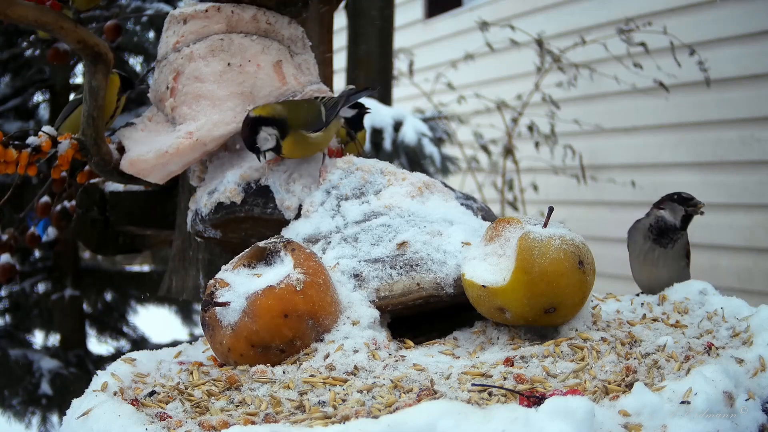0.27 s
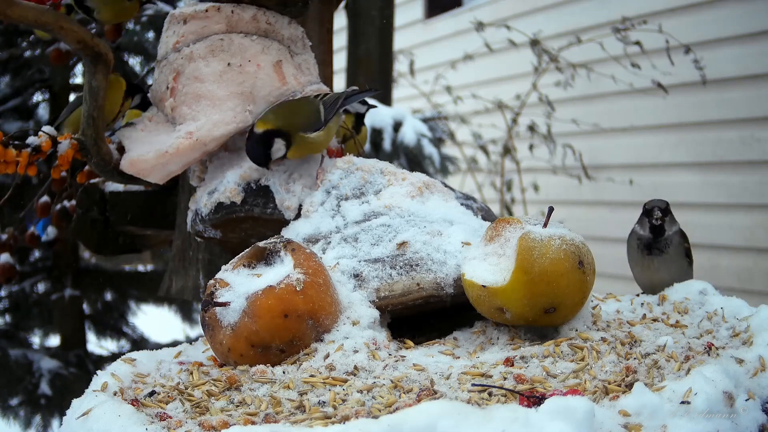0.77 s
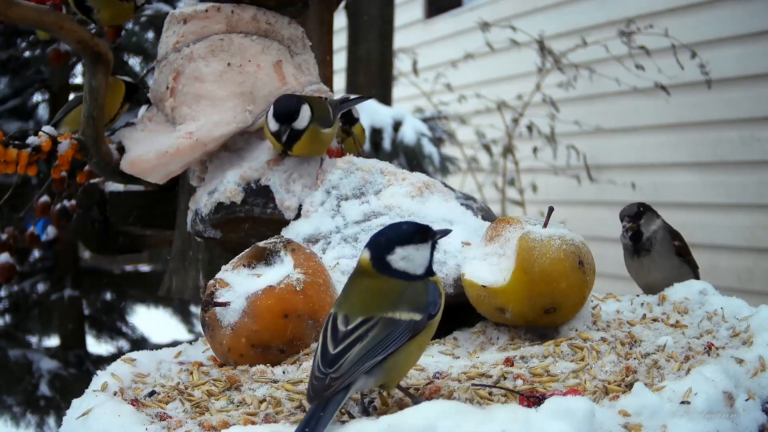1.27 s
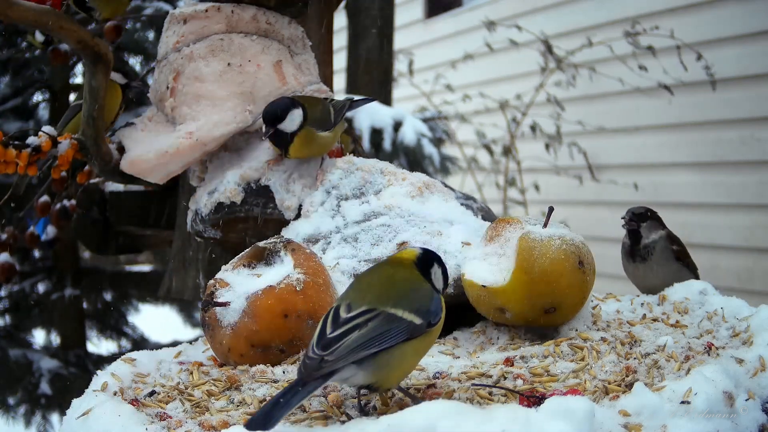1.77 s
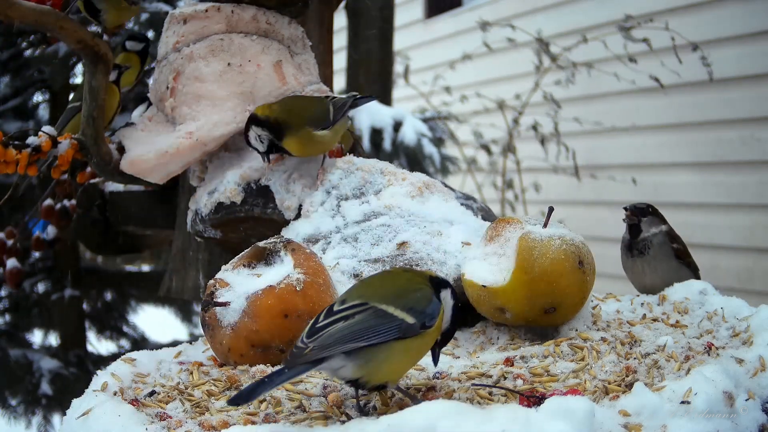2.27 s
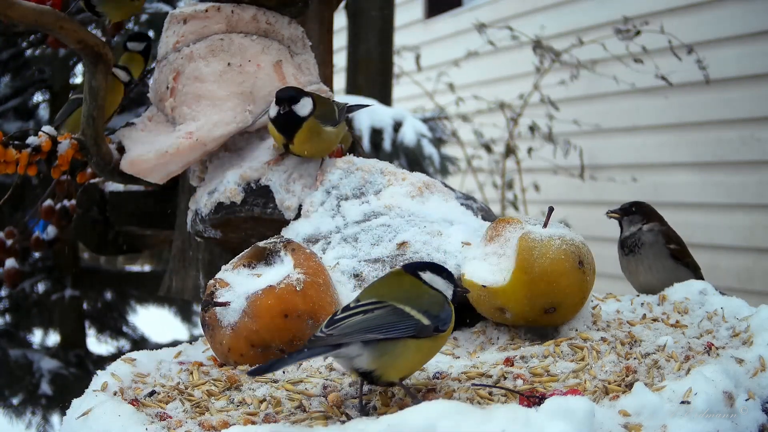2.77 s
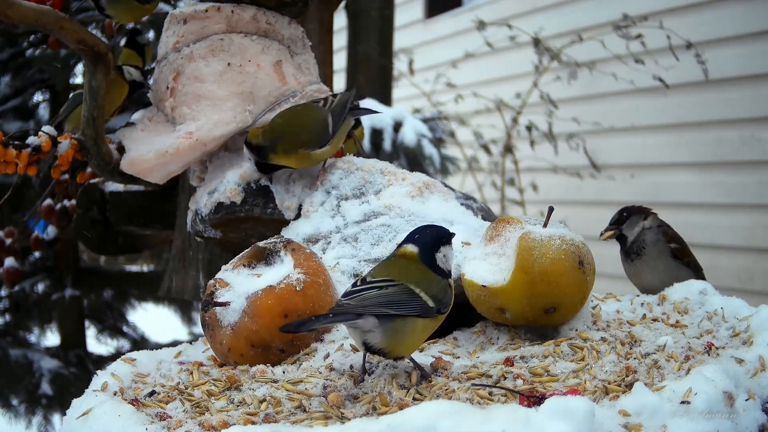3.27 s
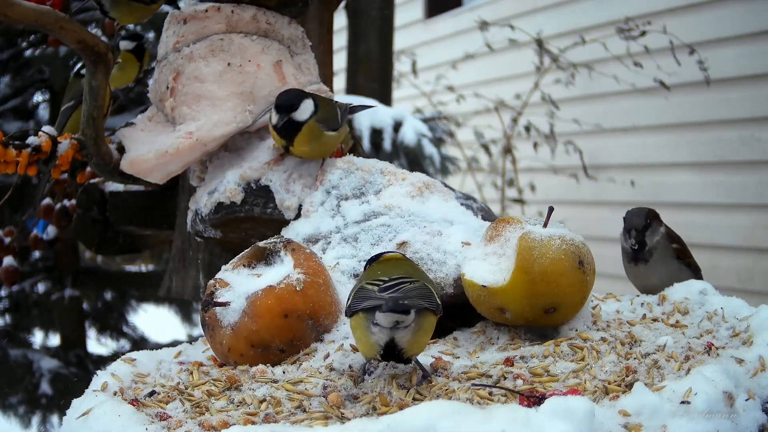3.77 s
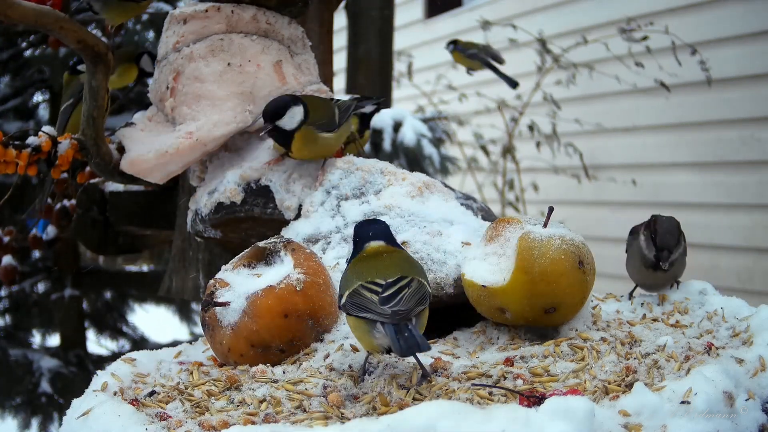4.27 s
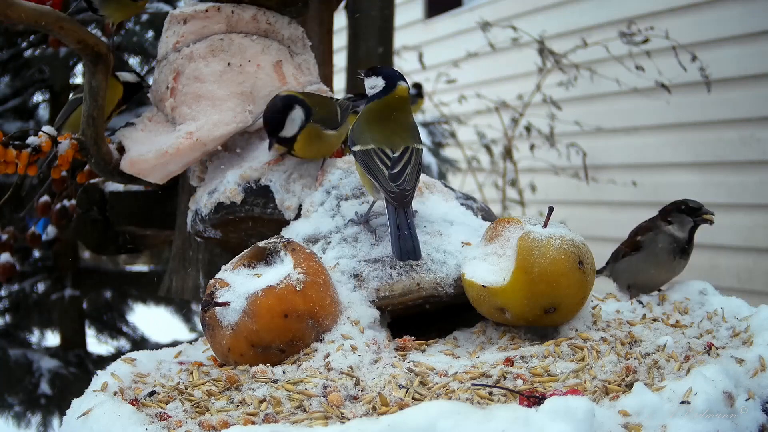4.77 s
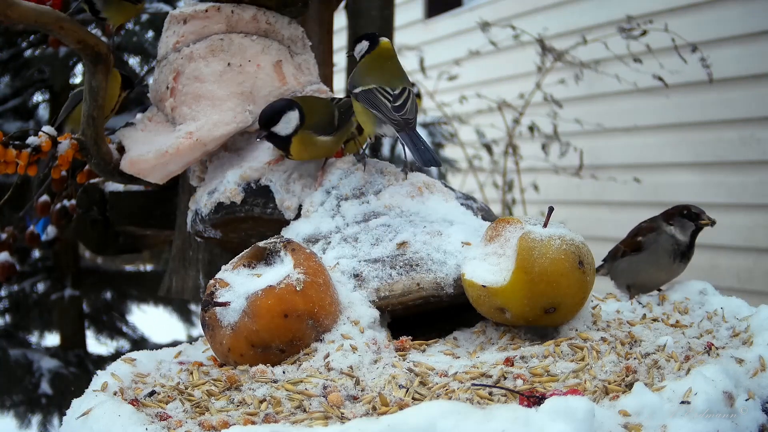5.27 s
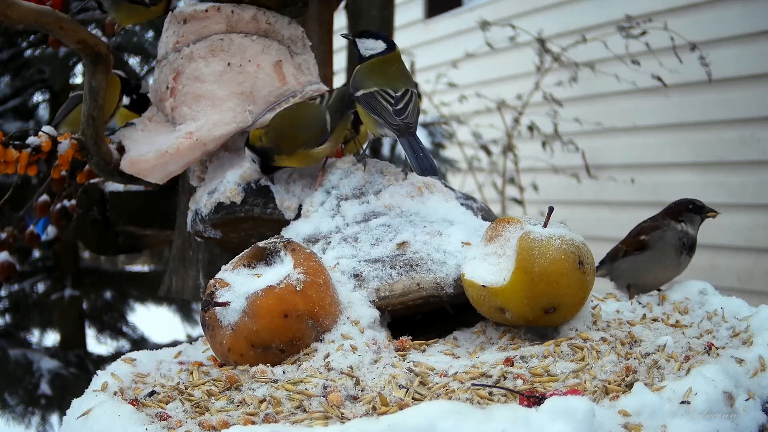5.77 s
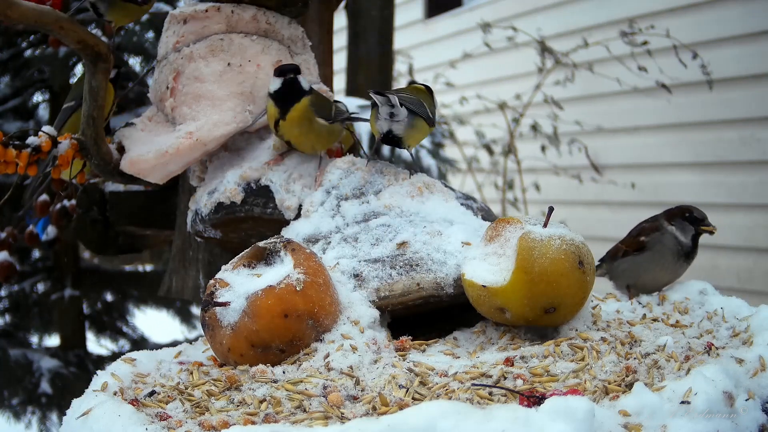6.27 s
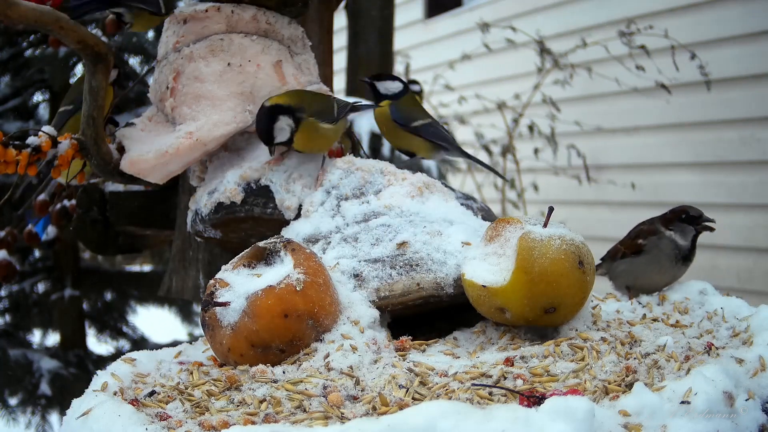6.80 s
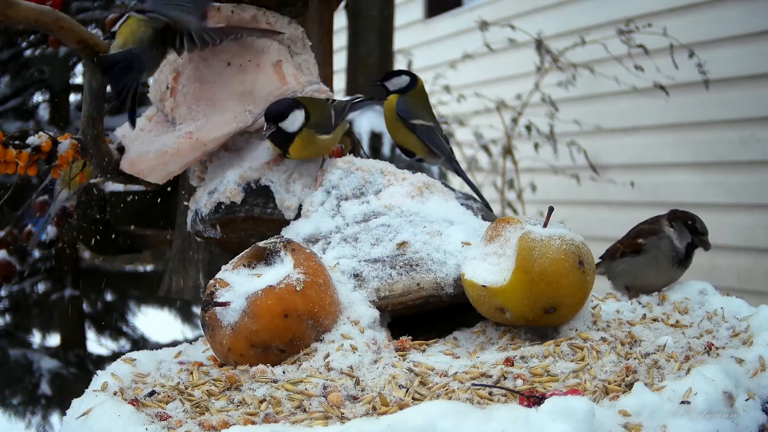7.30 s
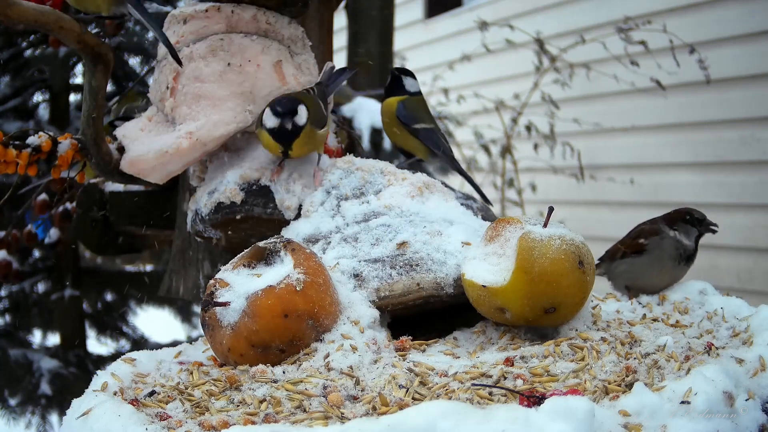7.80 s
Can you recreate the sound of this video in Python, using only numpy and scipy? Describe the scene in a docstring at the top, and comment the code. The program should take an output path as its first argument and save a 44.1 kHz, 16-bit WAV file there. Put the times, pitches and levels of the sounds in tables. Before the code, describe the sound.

Small birds peck and scratch through frozen seed on a snowy feeder, bright crackling snaps and ticks, thinning to a few faint whistles

```python
"""Small birds peck and scratch among frozen seed on a snowy feeder: 8 s, close and bright.
From the start husks snap as short rings over a patter of small snaps; claws stir grains, as ticks and noise bursts.
Landings and beak taps are short knocks; wing puffs and a breeze are shaped noise over a hush.
The snaps peak near 2.4 and 3.7 s; the patter thins from 5.75 s and is sparse after 7.2 s.
Thin gliding whistles call from 6.4 to 7.8 s; the last wing puffs come at 8 s."""
import sys
import numpy as np
from scipy import signal
from scipy.fft import rfft, irfft, next_fast_len
from scipy.io import wavfile
from scipy.ndimage import uniform_filter1d, map_coordinates

SR = 44100
rng = np.random.default_rng(int(sys.argv[2]) if len(sys.argv) > 2 else 0)


def persist_wave(psi):
    """Save psi, clipped to +-1, as 16-bit WAV."""
    counts = np.round(np.clip(psi, -1, 1) * 32767).astype(np.int16)
    wavfile.write(sys.argv[1], SR, np.atleast_2d(counts).T)


N = 354563

# rate of small random snaps: time_s, snaps_per_s
PATTER = [(0, 58), (5.75, 58), (5.9, 18), (7.15, 14), (7.25, 4.9), (8.04, 4.2)]
# air at the port: time_s, breeze_db, eddy_db
AIR = [(0.0, -66, -60), (1.03, -50, -55), (1.66, -50, -57), (2.24, -58.5, -59.5), (2.62, -54.5, -55.5),
       (3.36, -61.5, -60.5), (3.85, -50.5, -56.5), (4.25, -64, -55), (4.57, -57.5, -58.5),
       (8.04, -68, -62.5)]
SMALL_HZ = 7650  # typical pitch of grains and splinters
REST_DB = -59  # resting rustle at the busiest patter


def amp(db):
    """Gain of a level in dB."""
    return 10 ** (np.asarray(db) / 20)


def unit(x):
    """Scale to rms 1."""
    return x / np.sqrt(np.mean(x ** 2) + 1e-20)


def curves(rows):
    """Interpolate each column after the time to one value per sample."""
    time_s, *columns = np.transpose(rows)
    return [np.interp(np.arange(N) / SR, time_s, column) for column in columns]


def wobble(knots_per_s):
    """Smooth random curve through normal knots."""
    knots = rng.standard_normal(int(N * knots_per_s / SR) + 4)
    return map_coordinates(knots, [np.arange(N) * knots_per_s / SR])


def coloured(x, points):
    """Filter x through (hz, db) points on a log axis, rms 1."""
    size = next_fast_len(N + 8192)
    point_hz, point_db = np.transpose(points)
    hz = np.fft.rfftfreq(size, 1 / SR)
    gain_db = np.interp(np.log(hz + 1), np.log(point_hz + 1), point_db, left=-120, right=-120)
    return unit(irfft(rfft(x, size) * amp(gain_db), size)[:N])


def blip(t, hz, rise, fall, order=2):
    """Sine of random phase under an envelope that swells and dies, envelope peak 1."""
    shape = (1 - np.exp(-t / rise)) ** order * np.exp(-t / fall)
    return shape / shape.max() * np.sin(2 * np.pi * (hz * t + rng.random()))


def snaps():
    """Each husk rings briefly, knocks the tray, sheds crumbs and throws three late splinters."""
    # loudest beak and claw snaps: time_s, level_db, pitch_hz, knock_db (re snap), length_ms
    loud_snaps = [(0.041, -22.5, 7430, -23, 0.062), (0.1458, -30, 6800, -3, 0.21),
                  (0.1621, -19.5, 7300, -17, 0.25), (0.2382, -22, 7200, -9, 0.36),
                  (0.2944, -23.5, 7600, -20, 0.77), (0.3575, -14.5, 6960, -14, 0.34),
                  (0.3964, -21.5, 7800, -19, 0.12), (0.4106, -25, 7300, -20, 0.16),
                  (0.4674, -23.5, 7100, -36.0, 0.37), (0.4735, -17.5, 7330, -28, 0.15),
                  (0.5539, -21.5, 6830, -13, 0.14), (0.5693, -22, 7940, -36.0, 1.2),
                  (0.6194, -25, 7300, -4, 0.38), (0.8392, -13.5, 7800, -44.0, 0.76),
                  (0.9371, -29, 7830, -36.0, 0.7), (0.9405, -20.5, 7900, -24, 1.3),
                  (0.9626, -31, 7260, 1, 0.43), (0.9706, -10, 6800, -8, 0.21),
                  (0.9865, -15.5, 7500, -16, 0.38), (1.0257, -20, 7000, -6, 0.34),
                  (1.0484, -18, 6200, -6, 0.22), (1.0987, -17, 7140, -16, 0.33),
                  (1.109, -18, 7450, -18, 0.47), (1.1865, -16, 7700, -15.5, 0.84),
                  (1.1898, -20, 7400, -21.0, 0.13), (1.2043, -17, 7700, -25, 0.43),
                  (1.3018, -21.5, 7300, -3, 0.15), (1.3094, -16.5, 8600, -7, 0.13),
                  (1.3579, -18.5, 7950, -10, 0.12), (1.4085, -19, 7750, -9, 0.2),
                  (1.4249, -18, 8550, -18, 0.18), (1.4379, -20, 7150, -4, 0.18),
                  (1.4641, -18, 7960, -9, 0.19), (1.5162, -19, 7200, -29.0, 0.47),
                  (1.5244, -18, 7300, -26, 0.34), (1.5688, -15.5, 7260, -2, 0.25),
                  (1.6066, -15.5, 6560, -9, 0.24), (1.6269, -18.5, 7640, -22, 0.41),
                  (1.6826, -30, 7600, -7, 0.5), (1.7001, -25, 7100, 0, 0.25),
                  (1.8107, -15, 5530, -20, 0.21), (1.8242, -13, 7670, -6.5, 0.32),
                  (1.8324, -13, 7850, -14, 0.13), (1.8669, -19, 8070, -27.0, 0.13),
                  (2.0106, -21, 7400, -37.0, 0.7), (2.0426, -21.5, 7760, -7, 0.58),
                  (2.0605, -16, 7500, -15, 0.35), (2.1181, -17.5, 7420, -8, 0.57),
                  (2.1526, -21, 7970, -15, 2), (2.1603, -16, 7200, -10, 0.2),
                  (2.1904, -16.5, 7700, -24, 0.57), (2.2088, -17, 7500, -18, 0.24),
                  (2.2239, -20, 7950, -11, 0.31), (2.2867, -21.5, 6050, -2, 0.4),
                  (2.2906, -19, 7840, -21, 0.64), (2.3188, -17.5, 7800, -15, 0.84),
                  (2.3386, -18, 6440, -6, 0.26), (2.3466, -13, 7600, -15, 0.85),
                  (2.3537, -18, 7400, -22, 0.49), (2.371, -16, 6740, -10, 0.4),
                  (2.3766, -14, 7930, -17, 0.83), (2.3898, -18, 7200, -11, 0.76),
                  (2.4052, -8, 6200, -19, 0.16), (2.4131, -9.5, 7200, -8.5, 0.31),
                  (2.4229, -12, 7350, -21, 0.63), (2.4289, -9.0, 7860, -39.0, 1.6),
                  (2.5419, -15.5, 7700, -11, 0.5), (2.5586, -10.5, 8370, -18, 0.13),
                  (2.572, -10, 7200, -25.0, 0.22), (2.5766, -11, 7640, -7, 0.13),
                  (2.5854, -15.5, 6900, -28, 0.24), (2.6051, -17, 7460, -33.0, 0.72),
                  (2.6199, -19, 8900, -30, 0.5), (2.636, -14, 8100, -26, 0.43),
                  (2.6433, -16, 8060, -29, 0.37), (2.6668, -18, 7440, -23.0, 0.2),
                  (2.692, -26, 7600, -18, 0.3), (2.7466, -16.5, 7700, -16, 0.49),
                  (2.7618, -24.5, 7200, -6, 0.34), (2.7775, -27.5, 7800, -15, 0.6),
                  (2.8224, -21.5, 7530, -35.0, 0.34), (3.0515, -25, 7820, -33.0, 0.68),
                  (3.0949, -24, 7200, -9, 0.43), (3.1296, -16.5, 8000, -7.5, 0.35),
                  (3.2502, -14, 7700, -14.5, 0.59), (3.4152, -22.5, 6900, -5, 0.19),
                  (3.5312, -15.5, 7560, -10, 0.14), (3.5349, -20.5, 7060, -7.5, 0.63),
                  (3.5686, -20, 7450, -6, 0.17), (3.629, -20, 7260, -18, 0.28),
                  (3.6411, -8.5, 7960, -26, 0.98), (3.6671, -4, 7960, -15, 0.94),
                  (3.6737, -10, 7000, -15, 0.25), (3.6809, -12, 7140, -15, 0.48),
                  (3.688, -3.5, 7700, -19, 0.6), (3.7064, -14, 7100, -6, 0.15),
                  (3.7215, -11.5, 6200, -12, 0.16), (3.7357, -14, 7800, -24, 0.53),
                  (3.7484, -11, 7440, -18, 0.58), (3.7616, -12, 6640, -14, 0.14),
                  (3.7706, -15, 7500, -25.0, 0.35), (3.777, -12.5, 7800, -30, 0.24),
                  (3.7822, -11.5, 6860, -4, 0.18), (3.7917, -20, 7200, -26, 0.65),
                  (3.7968, -19.5, 7060, -7, 0.52), (3.8479, -14.5, 7300, -22, 0.18),
                  (3.9714, -20, 8100, -25, 0.63), (3.9814, -22, 8200, -18, 0.16),
                  (4.0925, -17, 7720, -12.5, 0.62), (4.1021, -22, 7200, -6, 0.19),
                  (4.1395, -21, 7400, -11, 0.13), (4.1889, -22.5, 7500, -16, 0.61),
                  (4.2055, -34, 6700, 7.5, 0.26), (4.2227, -22.5, 7600, -20, 0.54),
                  (4.2425, -28.5, 7900, -25, 0.9), (4.2553, -28, 7500, -9, 0.4),
                  (4.2892, -26, 7150, -5, 0.3), (4.293, -29, 7700, -18, 0.6),
                  (4.3247, -29.5, 7250, -2, 0.31), (4.3716, -25, 6360, -4, 0.28),
                  (4.3806, -18, 7460, -10, 0.43), (4.5089, -25, 6170, 3, 0.17),
                  (4.6125, -23.5, 7370, -10, 0.5), (4.6619, -22, 7000, -10, 0.36),
                  (4.8239, -17.5, 7280, -13, 0.42), (4.8293, -24, 6660, 3, 0.13),
                  (4.8789, -24.5, 7500, -11, 0.31), (5.069, -30, 5800, -7, 0.27),
                  (5.0868, -27, 6200, -11, 0.2), (5.1159, -23.5, 7300, -13, 0.25),
                  (5.1262, -32, 7400, -12, 0.3), (5.1905, -28, 7560, -16, 0.93),
                  (5.2136, -27.5, 7000, -6, 0.3), (5.2523, -19.0, 6400, -3.5, 0.21),
                  (5.2972, -25, 7300, -9, 0.3), (5.3071, -28, 6940, -10, 0.7),
                  (5.3263, -20, 7000, -17.0, 0.28), (5.3486, -20, 7440, -10, 0.39),
                  (5.3547, -18, 7600, -10, 0.47), (5.3668, -18, 6300, -19.0, 0.36),
                  (5.3707, -9, 7840, -36, 0.79), (5.3873, -24, 5850, -26, 0.44),
                  (5.4053, -17.5, 7340, -25, 0.13), (5.4583, -20, 7430, -10.5, 0.37),
                  (5.5685, -22, 7200, -34.0, 0.32), (5.6043, -26, 7100, -25, 0.46),
                  (5.6154, -22.5, 5970, -32, 0.32), (5.641, -13.5, 7620, -8, 0.53),
                  (5.7209, -20.5, 7750, -27.0, 0.46), (5.727, -17, 7400, -12.5, 0.21),
                  (5.7355, -19, 6550, -27, 0.23), (5.7572, -18, 7360, -13, 0.12),
                  (5.9233, -23.0, 7870, -16, 0.37), (6.0052, -22.5, 6780, -13, 0.12),
                  (6.2706, -24, 7640, -22, 0.25), (6.6219, -23.0, 7930, -28, 0.74),
                  (6.6458, -26.5, 6300, -16, 0.3), (6.6683, -16, 7530, -37, 0.45),
                  (6.8161, -24.5, 7240, -4.5, 0.28), (6.853, -26, 7260, -26, 0.21),
                  (7.0332, -21.5, 7860, -18, 0.95), (7.0606, -19, 7930, -28.0, 0.22),
                  (7.0666, -21, 7200, -22, 0.14), (7.0761, -21, 6940, -1.5, 0.18),
                  (7.1127, -23.5, 6200, -1, 0.078), (7.1708, -23.5, 7300, -13, 0.29),
                  (7.9306, -23.5, 7860, -41, 0.74), (7.9438, -25.5, 7800, -25, 0.42)]
    splinter_db, splinter_mean_delay_s = -18, 0.003  # level re snap, before loss with delay
    out, t = np.zeros(N + SR), np.arange(512) / SR
    for time_s, db, hz, knock_db, ms in list(loud_snaps) + small_snaps():
        span_s = max(ms, 0.2) / 1000
        husk = blip(t, hz, rise=2.1 * span_s, fall=0.45 * span_s, order=4)
        crumb_shape = np.minimum(t / span_s, 1) ** 2 * np.exp(-t / 0.0033)
        crumbs = amp(-14.0) * rng.standard_normal(len(t)) * crumb_shape * np.sin(2 * np.pi * hz * t)
        crumbs = uniform_filter1d(crumbs, size=3)
        tray_hz = 4400 * np.exp(0.092 * rng.standard_normal())
        tray = amp(knock_db) * blip(t, tray_hz, rise=0.5 * span_s, fall=0.63 * span_s, order=4)
        start = round((time_s - 0.95 * span_s) * SR)
        out[start:][:len(t)] += amp(db) * (husk + crumbs + tray)
        for late, loud, tone in zip(rng.exponential(size=3), *rng.standard_normal((2, 3))):
            piece = blip(t, SMALL_HZ * np.exp(0.11 * tone), rise=0.0009, fall=0.00041)
            piece_start = start + round((span_s + splinter_mean_delay_s * late) * SR)
            piece_db = db + splinter_db - 7.1 * late + 3.7 * loud
            out[piece_start:][:len(t)] += amp(piece_db) * piece
    # too small for low notes, soft above 10 kHz
    band = signal.butter(4, [3700, 10500], "band", fs=SR, output="sos")
    return signal.sosfilt(band, out[:N])


def small_snaps():
    """Rows like the loud snaps at random moments, thinned to the patter rate."""
    max_per_s, duration_s = 60, 8
    count = max_per_s * duration_s
    draw, spread = rng.random((count, 2)), rng.standard_normal((count, 3))
    time_s = 0.01 + duration_s * draw[:, 0]
    level_db = -39 + 3.5 * spread[:, 0]
    pitch_hz = SMALL_HZ * np.exp(0.067 * spread[:, 1])
    length_ms = 0.4 * np.exp(spread[:, 2] / 3)
    knock_db = -7 + 4.5 * np.log2(length_ms)  # longer snaps knock harder
    rows = np.transpose([time_s, level_db, pitch_hz, knock_db, length_ms])
    kept = draw[:, 1] < np.interp(time_s, *np.transpose(PATTER)) / max_per_s
    return rows[kept].tolist()


def grains(per_s):
    """Impulses at random moments, of unequal size."""
    hits = rng.random(N) < per_s / SR
    return hits * amp(np.minimum(5 * rng.exponential(size=N), 15))


def scratch():
    """Claws stir grains in clumps: ringing ticks, crunches of decaying noise, a thin bed and a swish."""
    # seed grit: hz, db_per_hz
    seed_spectrum = [(2800, -9.5), (4200, -10.5), (5700, 7), (6600, -2.5), (7800, 5), (8600, 1),
                     (9200, -44)]
    # dull swish of the claws: hz, db_per_hz
    swish_spectrum = [(900, 0), (1600, 6), (2800, 1.5), (4500, 9.5), (5500, -53)]
    # crisp treble: hz, db_per_hz
    crisp_spectrum = [(8500, -32), (9200, -0.5), (12300, -2.5), (15200, -10.5), (15800, -28)]
    level_db = scratch_db()
    ring = blip(np.arange(64) / SR, SMALL_HZ, rise=0.00015, fall=0.00022)
    ticks = 1.57 * np.convolve(grains(per_s=570) * rng.choice([-1, 1], N), ring)[:N]
    decay = np.exp(-np.arange(256) / SR / 0.0016)
    crunch = np.convolve(1.03 * grains(per_s=410), decay)[:N]
    # grains too small to tell apart; harder scratching crackles more
    bed = 1.5 * amp(-0.85 * (level_db - REST_DB))
    clumps = amp(1.8 * wobble(60) + 1.5 * wobble(20))
    grit = clumps * (ticks + (crunch + bed) * rng.standard_normal(N))
    swish = amp(-17.5) * coloured(rng.standard_normal(N), swish_spectrum)
    crisp_db = -10 + 1.8 * (level_db + 36.0)  # the treble comes up in louder bouts
    treble = grit + 1.14 * clumps * rng.standard_normal(N)
    crisp = amp(crisp_db) * coloured(treble, crisp_spectrum)
    return amp(level_db) * (coloured(grit, seed_spectrum) + swish + crisp)


def scratch_db():
    """Bouts rise, hold and fall; their powers add to a resting rustle that follows the patter."""
    # scratching bouts: start_s, held_s, level_db
    bout_rows = [(.48, 0.0045, -43), (.62, 0.01, -46), (.99, .01, -36.5), (1.09, 0.0099, -44.5),
                 (1.19, .02, -49), (1.3, 0.048, -37), (1.38, 0.15, -34), (1.823, 0.009, -34.5),
                 (2.05, 0.1, -44), (2.201, 0.028, -33), (2.33, 0.18, -37.5), (2.547, 0.11, -32.5),
                 (3.0, 0.19, -43), (3.4, 0.06, -50), (3.543, 0.023, -33.5), (3.691, 0.1, -32),
                 (3.82, 0.15, -35), (4.19, 0.028, -45.5), (4.6, 0.021, -42), (4.82, 0.013, -43.5),
                 (5.33, 0.088, -51), (5.62, .005, -48), (5.72, 0.0055, -47), (7.07, 0.018, -44),
                 (7.745, 0.028, -55)]
    rise_db_per_s, fall_db_per_s = 338, 222
    t = np.arange(0, N, 64) / SR
    start_s, held_s, held_db = np.transpose(bout_rows)[:, :, None]
    rise_db = rise_db_per_s * np.maximum(start_s - t, 0)
    fall_db = fall_db_per_s * np.maximum(t - start_s - held_s, 0)
    bouts_db = held_db - rise_db - fall_db
    busy = np.interp(t, *np.transpose(PATTER))
    rest_power = amp(2 * REST_DB) * busy / busy.max()
    total_db = 10 * np.log10(np.sum(amp(2 * bouts_db), axis=0) + rest_power)
    return np.interp(np.arange(N) / SR, t, total_db)


def knocks(rows):
    """Short damped sines that swell and die over a set number of cycles."""
    out, t = np.zeros(N + SR), np.arange(2048) / SR
    for time_s, db, hz, cycles in rows:
        span_s = cycles / hz
        start = round((time_s - span_s) * SR)
        out[start:][:len(t)] += amp(db) * blip(t, hz, rise=span_s, fall=span_s)
    return out[:N]


def landings():
    """Feet land on the feeder: dull, heavily damped knocks."""
    # landings: time_s, level_db, pitch_hz
    landing_rows = [(1.072, -36.5, 114), (1.166, -36, 364), (1.458, -31, 506), (1.478, -39, 226),
                    (1.55, -35, 280), (1.624, -32, 245), (1.91, -36, 235), (2.812, -38.5, 179),
                    (3.673, -34, 392), (4.447, -36.5, 192), (4.797, -40, 141), (5.604, -34.5, 313)]
    return knocks([(*row, 0.38) for row in landing_rows])


def beak_taps():
    """Beaks tap wood: brighter knocks."""
    # taps: time_s, level_db, pitch_hz, span_cycles
    tap_rows = [(2.7195, -27, 3050, 0.42), (5.193, -42, 1320, 0.82), (7.4495, -39, 2920, 0.6)]
    return knocks(tap_rows)


def calls():
    """Thin whistles that glide, mostly down, each with an octave overtone."""
    # calls: start_s, length_s, start_hz, bend_hz, end_hz, level_db, overtone_db (re fundamental)
    call_rows = [(6.387, 0.032, 4350, 4180, 4330, -55, 6.5), (6.579, 0.009, 5000, 4400, 4200, -46, -30),
                 (6.705, 0.011, 5000, 4640, 4200, -49, -30), (6.765, 0.022, 5000, 4740, 4150, -55, -4),
                 (6.856, 0.02, 5700, 5400, 5400, -52, -40), (6.9, 0.022, 5080, 4740, 4000, -50, -7),
                 (7.06, 0.041, 7560, 7170, 6500, -45, -45), (7.299, 0.041, 7300, 6850, 6560, -49, -52),
                 (7.746, 0.012, 5570, 4720, 4500, -53.5, -40), (7.76, 0.015, 4150, 4140, 4100, -54, -2),
                 (7.771, 0.009, 8200, 7060, 6500, -53, -40)]
    bend_at = 0.68  # share of the call
    out = np.zeros(N)
    for start_s, length_s, start_hz, bend_hz, end_hz, db, overtone_db in call_rows:
        u = np.linspace(0, 1, round(length_s * SR))
        pitch_hz = np.interp(u, [0, bend_at, 1], [start_hz, bend_hz, end_hz])
        phase = 2 * np.pi * np.cumsum(pitch_hz) / SR
        swell = np.sin(np.pi * u) ** 0.17
        tone = np.sin(phase) + amp(overtone_db) * np.sin(2 * phase)
        out[round(start_s * SR):][:len(u)] += amp(db) * swell * tone
    return out * amp(3.7 * wobble(300))  # small throats flutter


def wing_beats():
    """Time and level of each wing beat, evenly spread over its flutter and fading."""
    # wing flutters and hops: first_beat_s, length_s, level_db
    flutter_rows = [(0.453, 0.02, -49.5), (0.716, 0.051, -47), (0.88, 0.12, -57), (1.167, 0, -42.5),
                    (1.202, 0.035, -50.5), (1.46, .2, -41), (1.905, 0.0024, -50), (2.653, 0.016, -49),
                    (2.814, 0.039, -60), (3.602, 0.041, -43.5), (3.765, 0.016, -44.5),
                    (3.833, 0.023, -38.5), (4.389, 0.003, -51), (4.43, 0.061, -44), (4.8, 0.015, -44),
                    (5.596, 0.021, -46), (5.731, 0.021, -49), (5.963, 0.042, -43.5), (8.006, 0.11, -52.5)]
    beat_s, loss_db_per_beat = 0.042, 0.5
    beats = []
    for first_s, length_s, db in flutter_rows:
        times_s = np.linspace(first_s, first_s + length_s, 1 + round(length_s / beat_s))
        beats += [(time_s, db - loss_db_per_beat * k) for k, time_s in enumerate(times_s)]
    return beats


def wing_puffs_and_eddies():
    """Turbulence at the port: low noise that swells with the eddies and puffs at each wing beat."""
    # puff noise: hz, db_per_hz
    puff_spectrum = [(50, 4), (90, 0), (250, -2.5), (600, -8), (1200, -19)]
    puff_decay_s = 0.0065  # on both sides of the beat
    _, eddy_db = curves(AIR)
    swell, t = amp(eddy_db + 2.16 * wobble(30)), np.arange(N) / SR
    for time_s, db in wing_beats():
        near = slice(round((time_s - 0.04) * SR), round((time_s + 0.06) * SR))
        swell[near] += amp(db) * np.exp(-np.abs(t[near] - time_s) / puff_decay_s)
    return swell * coloured(rng.standard_normal(N), puff_spectrum)


def breeze():
    """Slow breeze at the port: very low noise under a level curve."""
    # breeze: hz, db_per_hz
    breeze_spectrum = [(15, -4), (29, -3), (42, -20.5), (80, -37.5)]
    breeze_db, _ = curves(AIR)
    return amp(breeze_db) * coloured(rng.standard_normal(N), breeze_spectrum)


def hush():
    """Distant outdoor hush: broad noise that drifts slowly in level."""
    # hush: hz, db_per_hz
    hush_spectrum = [(20, -3), (100, -4), (400, -7.5), (1000, -5.5), (2500, -6.5), (4500, -8.5), (5500, -1),
                     (6300, -11), (8500, -7), (9100, -30)]
    drift_db = 0.8 * wobble(5)
    return amp(-57 + drift_db) * coloured(rng.standard_normal(N), hush_spectrum)


def scene():
    """Sum all sources at one microphone."""
    birds = snaps() + scratch() + landings() + beak_taps() + calls()
    return (birds + wing_puffs_and_eddies() + breeze() + hush())[None]


def record(dry):
    """The microphone adds a thin hiss; the recorder keeps nothing above its band limit."""
    # microphone hiss: hz, db_per_hz
    hiss_spectrum = [(8500, -25), (9000, 0), (15000, -1), (15600, -30)]
    top_hz = 16490
    hiss = amp(-67) * coloured(rng.standard_normal(N), hiss_spectrum)
    size = next_fast_len(N + 8192)
    passed = np.fft.rfftfreq(size, 1 / SR) < top_hz
    return irfft(rfft(dry + hiss, size) * passed, size)[:, :N]


dry = scene()
out = record(dry)
persist_wave(out)
```